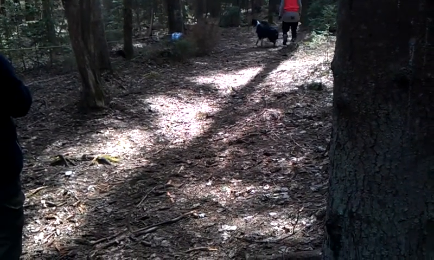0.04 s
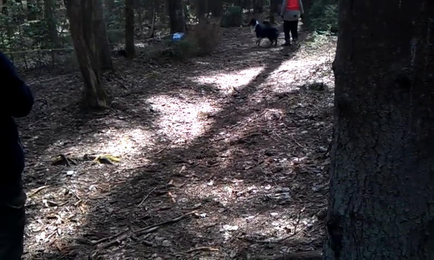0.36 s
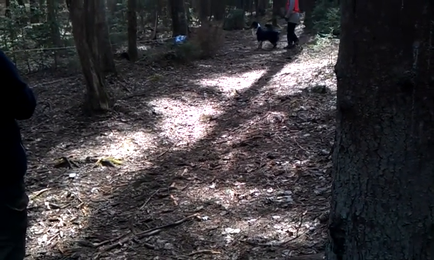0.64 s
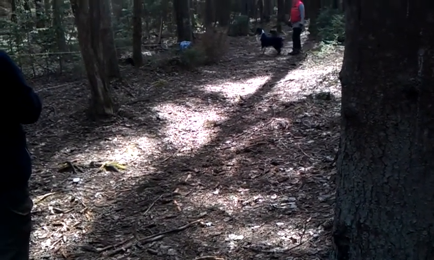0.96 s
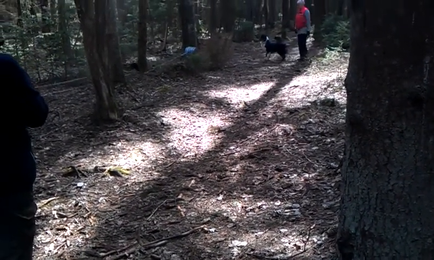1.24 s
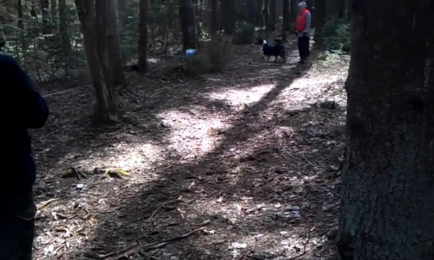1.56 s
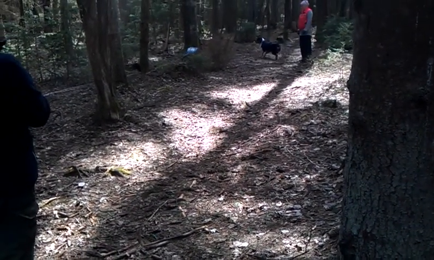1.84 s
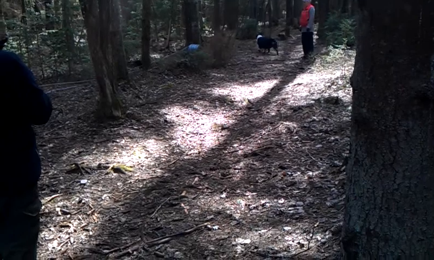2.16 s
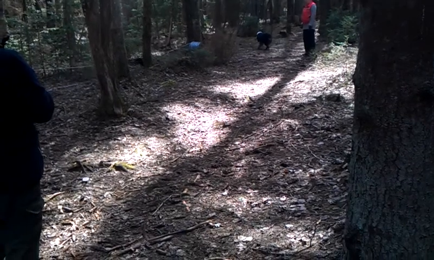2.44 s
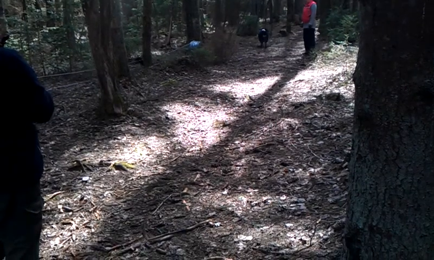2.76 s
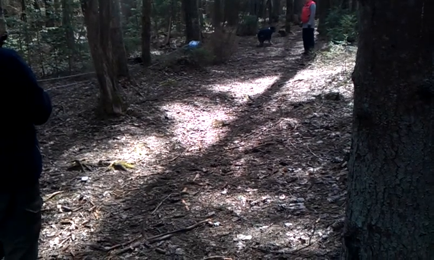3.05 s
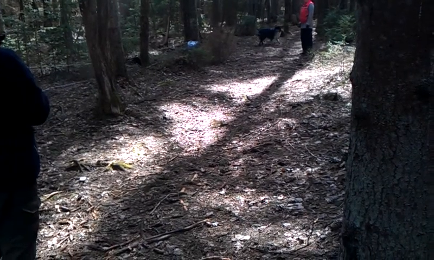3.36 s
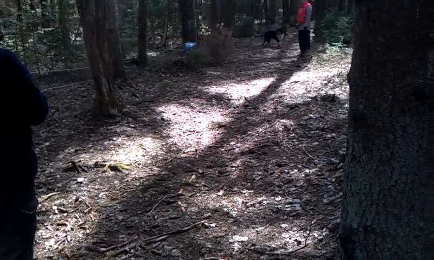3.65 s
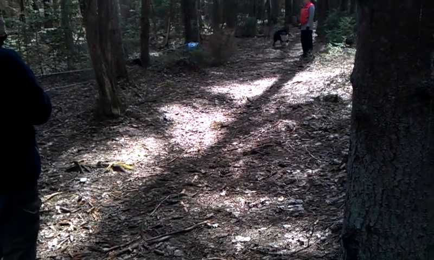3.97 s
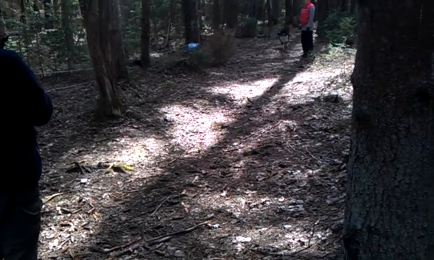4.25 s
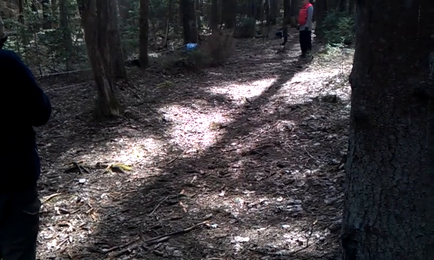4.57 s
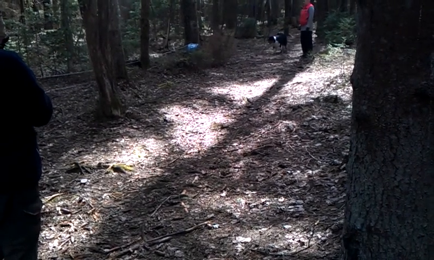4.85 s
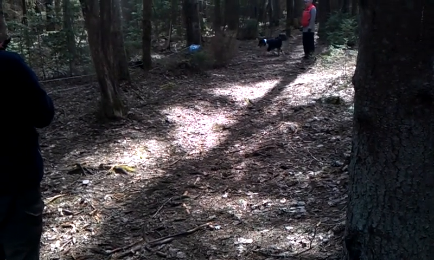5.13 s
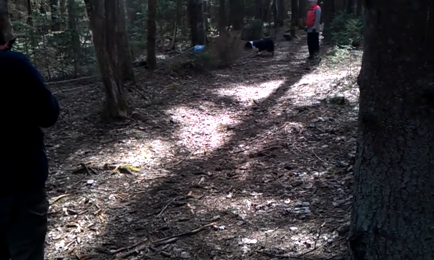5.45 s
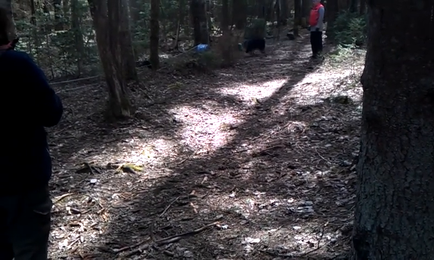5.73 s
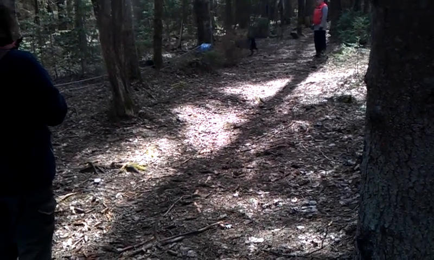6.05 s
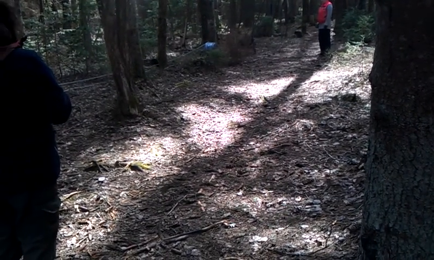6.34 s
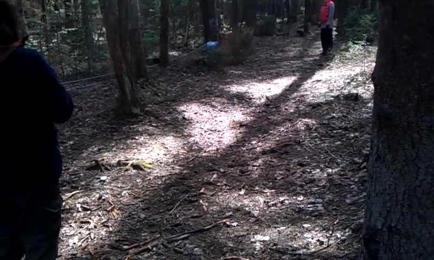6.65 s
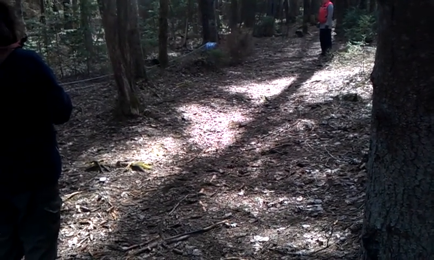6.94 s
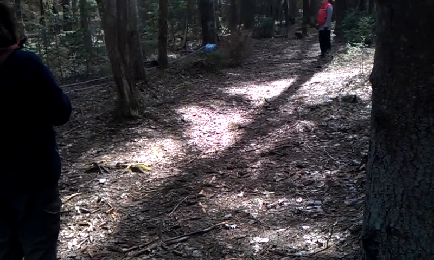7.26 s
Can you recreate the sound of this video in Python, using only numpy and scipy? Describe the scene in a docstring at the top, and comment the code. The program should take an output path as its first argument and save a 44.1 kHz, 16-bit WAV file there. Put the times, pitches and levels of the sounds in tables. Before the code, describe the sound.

A chain is hauled twice over a metal sheet in a forest. The links make a loud, bright jangling clatter and the sheet rings under them. The rattle slackens into a few single ringing clinks as a small bird gives falling whistles. Afterwards it is quiet: distant birds warble, dry leaves crackle and a few twigs snap over a faint hiss of air. The microphone slightly overloads on the loudest parts.

```python
"""A chain on a metal sheet

A chain is hauled twice over a metal sheet in a forest. Its links strike the sheet and make it ring:
a loud jangle that slackens into single clinks. Small birds whistle in the trees, dry leaves and twigs
crackle, and the air hisses faintly. The microphone's electronics add a thin buzz, and its limiter
(an automatic volume control) flattens both hauls."""
import sys
import numpy as np
from scipy import signal
from scipy.fft import rfft, irfft
from scipy.io import wavfile
from scipy.ndimage import uniform_filter1d

SR = 44100
rng = np.random.default_rng(int(sys.argv[2]) if len(sys.argv) > 2 else 0)


def transcribe(signal):
    """Save signal, clipped to [-1, 1], as a 16-bit WAV file at the path in sys.argv[1]."""
    frames = np.atleast_2d(signal).T
    limited = np.clip(frames, -1, 1)
    pcm = np.round(limited * 32767).astype(np.int16)
    wavfile.write(sys.argv[1], SR, pcm)


N = 330750
TIME = np.arange(N) / SR

# The two hauls on the chain and its last short slide: start_s, length_s, force_db
HAULS = [(0.194, .27, -11.5), (1.18, .27, -6), (1.462, .28, -19), (3.37, .1, -37.5)]
# The chain drags along and slackens: time_s, force_db
DRAG = [(0, -29.5), (.05, -32), (.12, -26.5), (1.101, -28), (1.649, -22), (1.83, -25), (1.88, -32),
        (2.07, -36.5), (2.169, -50.5), (3.1, -53), (3.521, -47.5), (3.721, -67)]
# Heavy blows of the chain on the sheet: start_s, level_db, midrange_db
BLOWS = [(.06, -12.5, -21), (.101, -14, -29), (0.148, -19.5, -3), (0.18, -17.5, -34), (.204, -3.5, -21.5),
         (0.507, -14, -21), (.56, -9.5, -22), (0.62, -17, -41), (0.665, -8.5, -25.5), (.725, -13.5, -54),
         (0.784, -9, -48), (.803, -7.5, -20), (0.885, -17, -28), (0.948, -12.5, -18), (.967, -10, -26),
         (0.988, -15, -24), (1.119, -11.5, -33), (1.163, -14.5, -6), (1.188, -8.5, -16), (1.459, -8.5, -34),
         (1.756, -9.5, -17.5), (1.81, -14.5, -20), (1.931, -17.5, -28), (1.976, -19, -23),
         (2.038, -22, -24), (2.113, -23, -20), (2.194, -24, -31), (2.222, -30.5, -19), (2.354, -23, -24),
         (2.413, -28, -25), (2.437, -26, -38), (2.541, -26, -32), (2.564, -25, -38), (2.615, -26, -40),
         (2.763, -22.5, -16), (3.343, -13.5, -20.5), (3.354, -20.5, -23), (3.43, -30.5, -26),
         (3.464, -25, -23), (3.554, -28, -22)]
# The sheet's natural tones (ring_s is the time to fade by 60 dB): pitch_hz, level_db, ring_s
SHEET_TONES = [(1035, -17.5, 0.12), (1587, -15.5, 0.1), (2056, -7, 0.064), (2417, -18.5, 0.49),
               (3770, -3.5, 0.026), (4092, -2.5, 0.024), (4522, 4.5, 0.012), (5145, -3.5, 0.028),
               (5320, 3.5, 0.11), (6530, 2.5, 0.05), (7060, 3, 0.018), (7390, -1, 0.031),
               (8330, -0.5, 0.011), (9610, -0.5, 0.027)]
# The tone colour of a link striking the sheet: pitch_hz, level_db
CLATTER_COLOUR = [(60, -57), (140, -37.5), (300, -20), (560, -26.5), (950, -9), (1700, -10.5), (2200, -4.5),
                  (3200, -2.5), (4600, 1.5), (5950, -2), (7200, 2), (10100, -5.5), (10700, -11.5),
                  (12500, -18.5), (15800, -22.5)]
# Single links ringing out clearly: start_s, pitch_hz, level_db
PINGS = [(.207, 4250, -11.5), (.21, 6540, -6), (.21, 5070, -12.5), (0.211, 9750, -13), (.235, 8230, -12),
         (.298, 6670, -13), (0.301, 9670, -16), (.43, 14000, -32), (.49, 9760, -27), (.57, 10250, -32),
         (.815, 13600, -29), (.815, 15500, -35), (1.119, 9630, -25), (1.315, 6780, -5), (1.355, 8070, -5.5),
         (1.395, 9590, -9.5), (1.447, 3810, -10), (1.708, 9780, -24.5), (1.86, 10000, -29),
         (3.264, 5200, -33), (3.295, 5150, -37), (3.345, 15200, -46), (3.36, 9360, -33), (3.43, 9300, -39),
         (3.475, 9400, -39.5), (3.526, 5260, -45), (3.627, 5340, -48)]
# Clinks of the chain's loose end: start_s, level_db, sparkle_db
CLINKS = [(2.731, -30, -11), (2.795, -36, -20), (2.808, -32, -20), (2.838, -38.5, -18), (3.263, -38.5, 1),
          (3.294, -43, 5)]
# The loose end's natural tones: pitch_hz, level_db, ring_s
END_TONES = [(2150, -16.5, 0.63), (2820, -23, 0.82), (3741, -9.5, 0.79), (4970, -3, 0.6), (5270, -6, 0.18),
             (6422, -0.5, 0.22), (6853, -3, 0.3), (7320, 8, 0.12), (7680, 4, 0.13), (9300, 3, 0.089)]
# Its highest tones, which only a sharp touch wakes: pitch_hz, level_db, ring_s
SPARKLE_TONES = [(9700, 3, 0.21), (13050, -1, .14), (13790, 2, .14), (15300, -5, .1)]
# The tone colour of its chatter: pitch_hz, level_db
CHATTER_COLOUR = [(400, -32), (2500, -12), (5000, 18.5), (9800, 13.5), (11400, 0), (12100, -26),
                  (15800, -40)]
# Hollow knocks of the sheet: start_s, peak_db, centre_hz
KNOCKS = [(.28, -39.5, 316), (0.391, -33.5, 288), (0.419, -45, 136), (1.171, -40.5, 367),
          (1.471, -41.5, 401)]
# Low tones of the whole sheet flexing: pitch_hz, level_db, ring_s
FLEX_TONES = [(136, -12, 0.73), (217, 3.5, 0.19), (298, 2, 0.17), (401, 2, 0.41)]
# A nearer bird's falling whistles: start_s, length_s, from_hz, to_hz, level_db
NEAR_WHISTLES = [(2.195, 0.14, 8800, 7750, -47), (2.425, 0.13, 6830, 5720, -43),
                 (2.608, .105, 7450, 5770, -41.5), (3.72, .092, 8040, 5870, -56),
                 (3.868, 0.079, 7200, 5700, -56)]
# The warbled notes of far birds: start_s, length_s, from_hz, to_hz, level_db
FAR_WARBLE = [(3.772, 0.042, 4700, 5320, -62), (3.855, .15, 3690, 4120, -63),
              (4.135, 0.078, 4780, 4833, -54), (4.218, 0.031, 4800, 5330, -59), (4.25, .1, 5200, 4320, -59),
              (4.455, 0.1, 4030, 5200, -59.5), (4.595, .06, 5150, 4420, -59),
              (4.715, 0.048, 5450, 4730, -60), (4.82, 0.041, 4670, 5000, -56),
              (4.965, 0.038, 4500, 5100, -58), (5.032, 0.047, 5350, 4750, -54),
              (5.28, 0.039, 4600, 5100, -56), (5.338, 0.036, 5400, 4720, -53),
              (5.57, 0.07, 3980, 4060, -53.5), (5.668, 0.045, 5220, 4800, -53),
              (5.915, 0.082, 4930, 4480, -57), (5.98, 0.047, 5500, 4720, -51.5),
              (6.062, 0.064, 3970, 5280, -51.5), (6.78, 0.17, 4900, 4200, -59.5),
              (7.157, .06, 4330, 3910, -55.5), (7.352, .14, 5160, 4710, -60),
              (7.415, 0.076, 4100, 3920, -58.5)]
# Louder scuffs in the leaves: middle_s, half_length_s, level_db
SCUFFS = [(4.665, .06, -56), (5.3, 0.45, -61.5), (6.117, 0.33, -59.5)]
# The tone colour of crackling leaves: pitch_hz, level_db
LEAF_COLOUR = [(500, -20), (2500, -8), (4800, -9), (7500, 4.5), (11000, -12), (15800, -19)]
# Twigs and dry leaves snapping: start_s, peak_db, pitch_hz
SNAPS = [(4.659, -31, 7500), (4.69, -31, 7000), (5.62, -20.5, 5940)]
# The tone colour of forest air and microphone hiss: pitch_hz, level_db
AIR_COLOUR = [(18, -40), (30, -6), (93, -8), (402, 1.5), (645, -1.5), (1090, -0.5), (2520, -16.5),
              (3740, -9), (4490, -4), (5540, -8), (7990, -4), (10100, -5), (12500, -16.5), (13900, -4.5),
              (15800, -17.5)]
# The strength of the electronic buzz across the treble: pitch_hz, level_db
BUZZ_COLOUR = [(6500, -71), (7400, -73), (8000, -65.5), (8450, -72), (8700, -107)]
# How long the echo lasts among the trunks: pitch_hz, ring_s
FOREST_ECHO = [(200, 0.66), (2000, 1), (5000, 1), (9000, 0.64), (15000, 0.47)]


def chain(links=24):
    """Links rain on the sheet, each with its own tones; a hard haul makes the sheet sing."""
    force = chain_force()
    song_share = np.interp(20 * np.log10(force), [-25, -14], [.22, .5])
    rattle, song = np.zeros(N), np.zeros(N)
    for _ in range(links):
        tones = unit(sum(mode(hz, .11) for hz in rng.uniform(1500, 15500, size=6)))
        knock = unit(crash(ring_s=.03) + amp(-4) * tones)
        hits = impacts(per_second=24, spread_db=2.5) * force * np.sqrt(1 - song_share)
        rattle += convolve(hits, knock) / np.sqrt(links)
    weights = unit(amp([db for _, db, _ in SHEET_TONES]))
    for weight, (hz, _, ring_s) in zip(weights, SHEET_TONES):
        # the chain's weight travels over the sheet, so each tone swells, fades and shifts on its own
        swell = amp(3.2 * drift(rate_hz=11) - 1.2)
        pitch = hz * (1 + .005 * drift(rate_hz=12))
        hits = impacts(per_second=700, spread_db=-3) * force * np.sqrt(song_share)
        song += weight * resonate(hits * swell, pitch, ring_s)
    return convolve(rattle, colour(CLATTER_COLOUR)) + song


def chain_force(stir_db=-14.5, stir_s=.023):
    """How hard the links run: the drag, the hauls and the brief stir after each blow add up."""
    drag_s, drag_db = np.transpose(DRAG)
    power = amp(np.interp(TIME, drag_s, drag_db, right=-120)) ** 2 + haul_force() ** 2
    for start_s, db, _ in BLOWS:
        stir = amp(db + stir_db) * np.exp(-TIME[:SR] / stir_s)
        add(power, start_s, stir ** 2)
    return np.sqrt(power)


def haul_force(swell_share=.6, lag_s=.014):
    """Each haul starts with a jerk, swells and lets go; the links lag a little behind it."""
    force = np.zeros(N)
    for start_s, length_s, db in HAULS:
        arch = np.sin(np.linspace(0, np.pi, int(length_s * SR)))
        add(force, start_s, amp(db) * (1 - swell_share + swell_share * arch))
    keep = np.exp(-1 / (lag_s * SR))
    return signal.lfilter([1 - keep], [1, -keep], force)


def blows():
    """A bunch of links lands almost at once: a crack, a short crash and the sheet's ring."""
    out = np.zeros(N)
    build_up = 1 - np.exp(-TIME[:16000] / .0015)
    for start_s, db, midrange_db in BLOWS:
        # each blow has its own amount of middle pitches, sounding fuller or thinner
        boost_db = 1.2 * (midrange_db + 20)
        shape = [(hz, level + np.interp(hz, [2500, 4500], [boost_db, 0]))
                 for hz, level in CLATTER_COLOUR]
        bunch = unit(crash(ring_s=.065) * build_up)
        crack = .18 * crash(ring_s=.0057)
        burst = convolve(unit(crack + bunch), colour(shape))
        add(out, start_s, amp(db + 14) * (burst + amp(-5) * ring(SHEET_TONES)))
    return out


def pings(count=70, low_hz=3580, high_hz=15580, twin_gap_hz=90):
    """A link that swings free rings with one clear tone, which wavers against a close twin."""
    out, force, flung = np.zeros(N), chain_force(), []
    # the running chain flings extra links at random
    for at in rng.choice(N, size=count, p=force / force.sum()):
        hz = rng.uniform(low_hz, high_hz)
        colour_db = .9 * value_at(CLATTER_COLOUR, hz)  # free links follow the clatter only in part
        flung.append((at / SR, hz, 20 * np.log10(force[at]) - 3 + colour_db))
    build_up = 1 - np.exp(-TIME[:16000] / .006)
    for start_s, hz, db in PINGS + flung:
        ring_s = .12 * np.sqrt(hz / low_hz)  # higher pings ring longer
        twin_hz = hz + twin_gap_hz * rng.uniform(-.895, 1)
        tone = build_up * (mode(hz, ring_s) + .99 * mode(twin_hz, ring_s))
        add(out, start_s, amp(db) * tone / abs(tone).max())
    return out


def clinks():
    """The chain's loose end strikes, chatters briefly and rings on."""
    out = np.zeros(N)
    for start_s, db, sparkle_db in CLINKS:
        chatter = unit(crash(ring_s=.059) + crash(ring_s=.26))
        tick = convolve(chatter, colour(CHATTER_COLOUR))
        jingle = .7 * tick + .9 * ring(END_TONES) + .2 * amp(sparkle_db) * ring(SPARKLE_TONES)
        add(out, start_s, amp(db + 32.5) * jingle)
    return out


def sheet_knocks(db_per_octave=21.5):
    """The chain's weight flexes the sheet: hollow knocks, each favouring the tones near one pitch."""
    out = np.zeros(N)
    for start_s, db, centre_hz in KNOCKS:
        knock = ring([(hz, level - db_per_octave * abs(np.log2(hz / centre_hz)), ring_s)
                      for hz, level, ring_s in FLEX_TONES])
        add(out, start_s, amp(db) * knock / abs(knock).max())
    return out


def bird(notes, tremor):
    """Each note is a whistle that swoops from one pitch to another and trembles a little."""
    out, tremble, flutter = np.zeros(N), drift(rate_hz=51), drift(rate_hz=64)
    for start_s, length_s, from_hz, to_hz, db in notes:
        progress = np.linspace(0, 1, int(length_s * SR))
        at = (int(start_s * SR) + np.arange(len(progress))) % N
        glide = progress + .55 * progress * (1 - progress)  # fast at first, then slower
        hz = (from_hz + (to_hz - from_hz) * glide) * (1 + tremor * tremble[at])
        level = amp(db + 2 * flutter[at]) * signal.windows.tukey(len(at), .5)
        add(out, start_s, level * np.sin(2 * np.pi * np.cumsum(hz) / SR))
    return out


def leaves_and_twigs(rustle_from_s=2.6, rustle_db=-61):
    """Dry leaves crackle underfoot and a few twigs snap."""
    scuffs = sum((amp(db) * np.exp(-((TIME - middle_s) / half_s) ** 2 / 2)) ** 2
                 for middle_s, half_s, db in SCUFFS)
    shuffle = np.sqrt(amp(rustle_db) ** 2 * (TIME > rustle_from_s) + scuffs)
    crackle = impacts(per_second=500, spread_db=3) * shuffle
    out = convolve(crackle, colour(LEAF_COLOUR))
    for start_s, db, hz in SNAPS:
        snap = mode(hz, .004) + .6 * mode(hz * 1.1, .003) + .6 * mode(hz * .86, .002)
        add(out, start_s, amp(db) * snap / abs(snap).max())
    return out


def thicket(song):
    """Branches around the birds smear their notes."""
    return song + amp(-4) * convolve(song, crash(ring_s=.12))


def forest_echo(sound, echoes_per_s=2500):
    """Trunks scatter the sound back in a thin tail whose treble dies first."""
    fade_in = np.clip(TIME[:SR] / .015, 0, 1)
    echoes = rng.standard_normal(SR) * (rng.random(SR) < echoes_per_s / SR) * fade_in
    hz, t, bands = signal.stft(echoes, SR, nperseg=256)
    fade_out = amp(-60 * t / value_at(FOREST_ECHO, hz)[:, None])
    tail = signal.istft(bands * fade_out, SR, nperseg=256)[1]
    return convolve(sound, unit(tail))


def air(level_db=-55.5):
    """The forest air and the microphone hiss softly and steadily."""
    return amp(level_db) * convolve(rng.standard_normal(N), colour(AIR_COLOUR, size=8192))


def buzz(pulse_hz=216.7):
    """The electronics tick at a steady rate, heard only as high overtones."""
    overtones_hz = np.arange(30, 41) * pulse_hz
    return sum(amp(value_at(BUZZ_COLOUR, hz)) * np.cos(2 * np.pi * hz * TIME) for hz in overtones_hz)


def overload(sound, knee=.47, headroom=.39, skew=.079):
    """The microphone bends only the peaks above its knee, unevenly, adding fizz and a low rumble."""
    excess = sound - np.clip(sound, -knee, knee * (1 + skew))
    bend = headroom * np.tanh(excess / headroom) - excess
    return sound + signal.lfilter(*signal.butter(2, 70, "highpass", fs=SR), bend)


def limiter(sound, ceiling_db=-18, recovery_db_per_s=160):
    """Turns the volume down as soon as the sound passes the ceiling, then lets it come back."""
    power_db = 10 * np.log10(abs(uniform_filter1d(sound[0] ** 2, size=260)) + 1e-12)
    fall_db = TIME * recovery_db_per_s
    held_db = np.maximum.accumulate(power_db + fall_db) - fall_db
    over_db = np.maximum(held_db - ceiling_db, 0)
    return sound * amp(-signal.lfilter(np.ones(64) / 64, 1, over_db))


def mode(hz, ring_s, size=16000):
    """One fading natural tone, which takes a few cycles to build up."""
    t = TIME[:size]
    return unit(np.sin(2 * np.pi * hz * t) * amp(-60 * t / ring_s) * (1 - np.exp(-hz * t / 2)))


def ring(tones):
    """An object rings after a blow; where it is hit, left to chance, starts each tone up or down."""
    return unit(sum(rng.choice([-1, 1]) * amp(db) * mode(hz, ring_s) for hz, db, ring_s in tones))


def crash(ring_s, size=16000):
    """Countless short tones blur into a fading burst of noise."""
    return unit(rng.standard_normal(size) * amp(-60 * TIME[:size] / ring_s))


def resonate(hits, hz, ring_s):
    """Hits keep one tone ringing while its pitch follows the curve hz."""
    turn = np.exp(2j * np.pi * np.cumsum(hz) / SR)
    keep = amp(-60 / (ring_s * SR))
    ringing = signal.lfilter([np.sqrt(1 - keep ** 2)], [1, -keep], hits / turn + 1e-18)
    smoothed = signal.lfilter(*signal.butter(2, np.mean(hz) / 10, fs=SR), ringing)
    return np.sqrt(2) * (turn * smoothed).real


def impacts(per_second, spread_db):
    """Random clicks of uneven size, with an average power of 1."""
    sizes = amp(spread_db * np.minimum(rng.exponential(1, N), 3)) * rng.choice([-1, 1], N)
    return unit(sizes * (rng.random(N) < per_second / SR)) * np.sqrt(N)


def drift(rate_hz):
    """A smooth random wander, typically about 1 in size."""
    spectrum = rfft(rng.standard_normal(N)) / (1 + (np.fft.rfftfreq(N, 1 / SR) / rate_hz) ** 4)
    return unit(irfft(spectrum, N)) * np.sqrt(N)


def colour(points, size=2048):
    """A short click with the given tone colour: its balance of low and high pitches."""
    log_gain = np.log(amp(value_at(points, abs(np.fft.fftfreq(size, 1 / SR)))))
    spectrum = np.exp(np.conj(signal.hilbert(log_gain)))  # packs the energy at the click's start
    return unit(np.fft.ifft(spectrum).real[:size // 2])


def value_at(points, hz):
    """Reads between a table's rows, with pitch spaced in octaves."""
    pitches, values = np.transpose(points)
    return np.interp(np.log(hz + 1), np.log(pitches + 1), values)


def convolve(sound, response):
    """Gives a sound the ring or colour of a response, keeping its length."""
    return signal.oaconvolve(sound, response)[:len(sound)]


def add(mix, start_s, sound):
    """Mixes a sound in at the given time."""
    part = mix[max(round(start_s * SR), 0):][:len(sound)]
    part += sound[:len(part)]


def amp(db):
    """Turns decibels into a volume factor."""
    return 10 ** (np.asarray(db) / 20)


def unit(sound):
    """Scales to an energy of 1."""
    return sound / np.sqrt(np.sum(sound ** 2) + 1e-20)


def scene():
    """Metal and birds among the trees, leaves close by; both channels are the same."""
    metal = chain() + blows() + sheet_knocks() + clinks() + pings()
    near, far = bird(NEAR_WHISTLES, tremor=.008), bird(FAR_WARBLE, tremor=.011)
    near, far = thicket(near), thicket(far)
    birds = near + far + forest_echo(amp(-6) * near + amp(-3.5) * far)
    mono = metal + amp(-17) * forest_echo(metal) + birds + leaves_and_twigs() + air() + buzz()
    return np.array([mono, mono])


def record(dry):
    """The microphone overloads, the limiter holds the hauls level, and the highest treble is cut."""
    treble_cut = signal.firwin(511, cutoff=15850, window=("kaiser", 9), fs=SR)
    return signal.oaconvolve(limiter(overload(dry)), treble_cut[None], "same")


dry = scene()
out = record(dry)
transcribe(out)
```